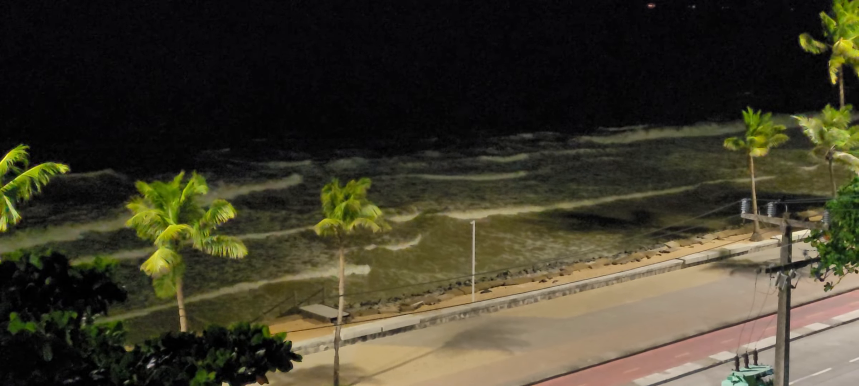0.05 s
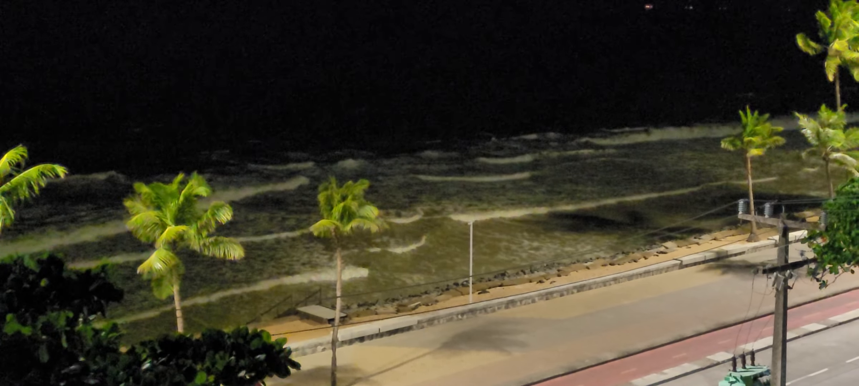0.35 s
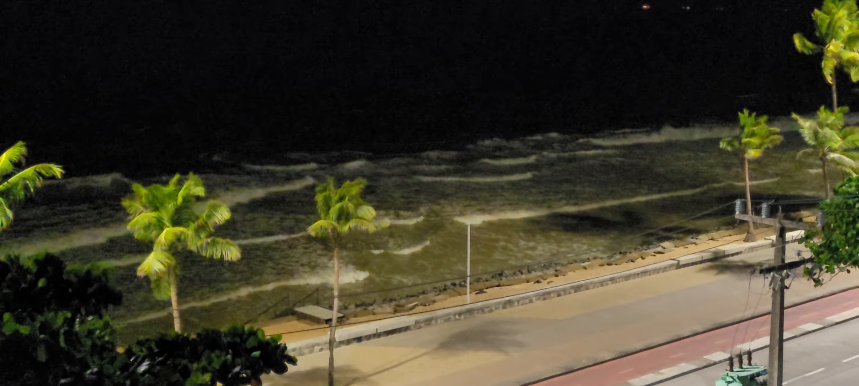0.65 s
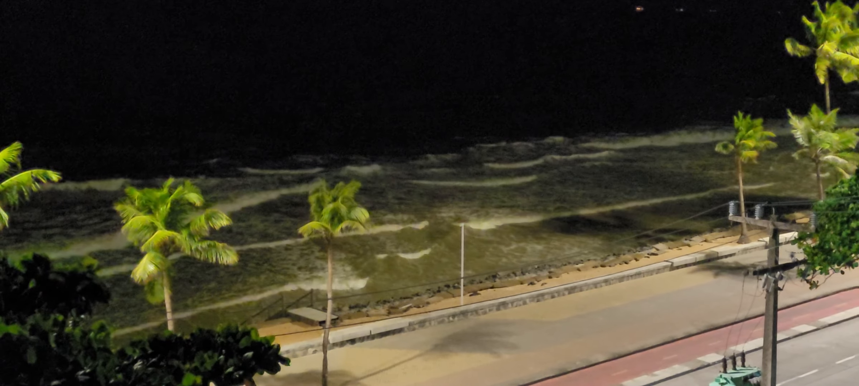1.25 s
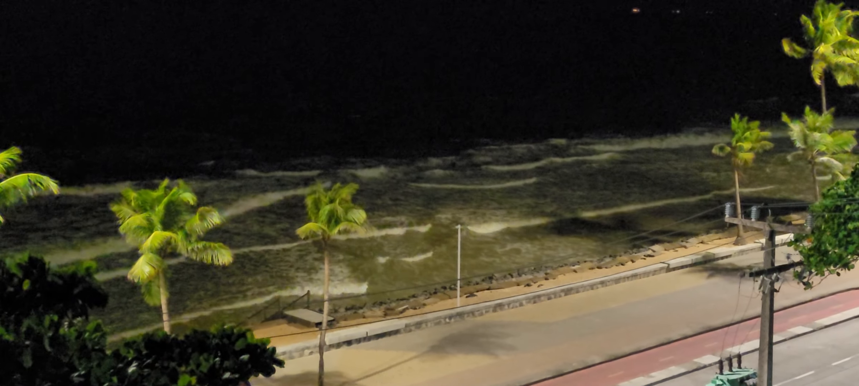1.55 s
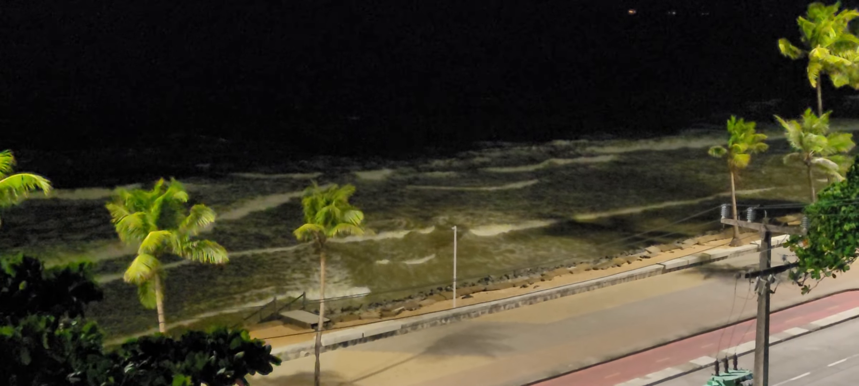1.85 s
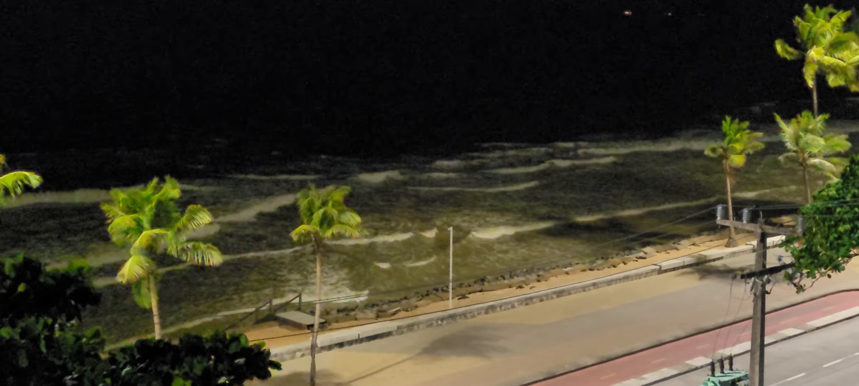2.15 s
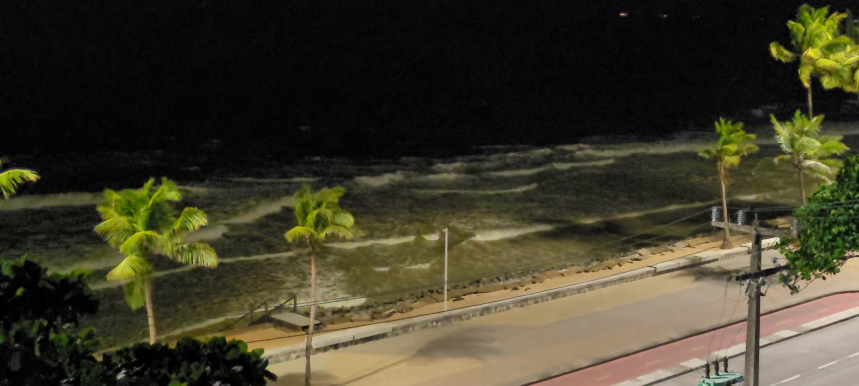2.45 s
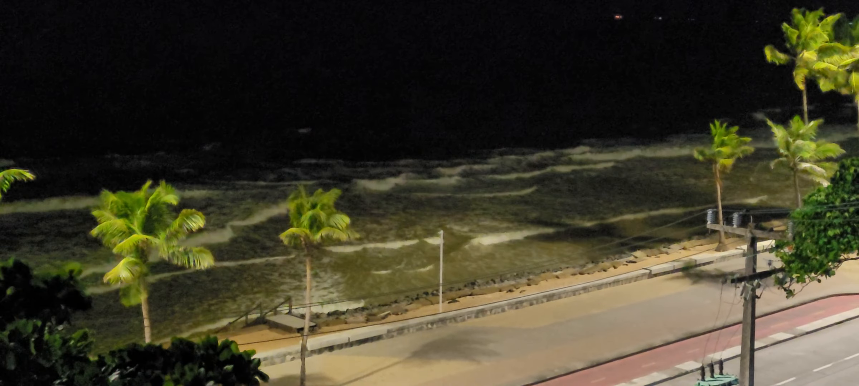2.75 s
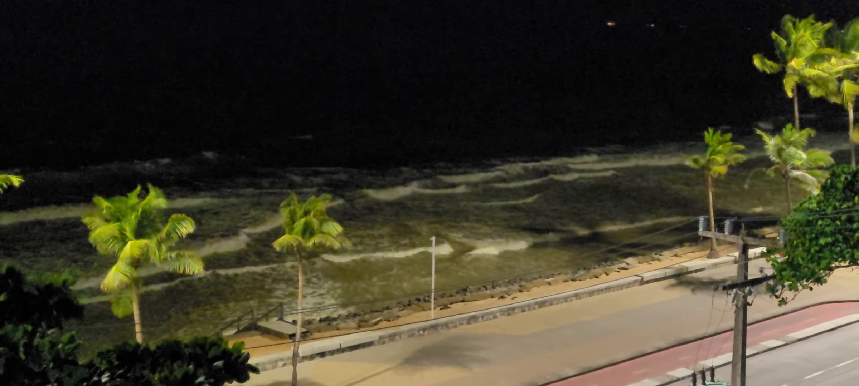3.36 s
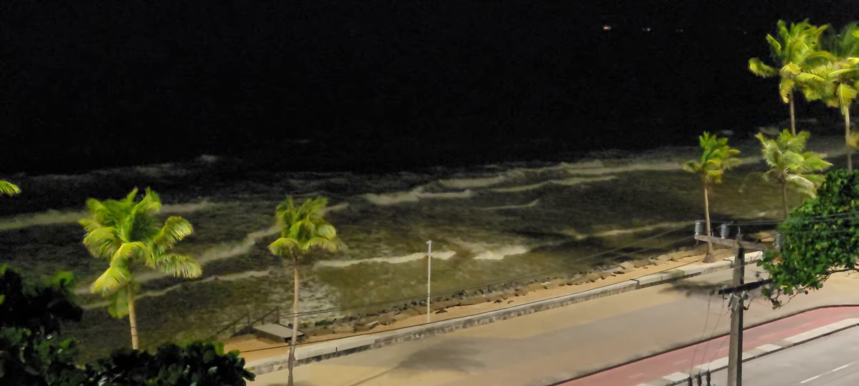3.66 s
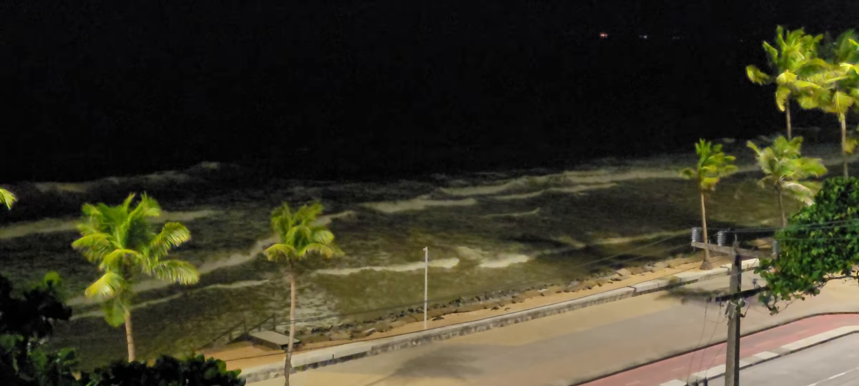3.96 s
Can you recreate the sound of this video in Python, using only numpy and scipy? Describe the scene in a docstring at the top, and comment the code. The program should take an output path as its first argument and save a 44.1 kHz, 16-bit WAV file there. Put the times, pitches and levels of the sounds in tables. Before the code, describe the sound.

Sea surf breaks in a steady roar and foamy hiss, heard from high above a beachfront. Strong gusts rumble and thump on the stereo microphone with a faint hollow hoot, growing hardest near the end before everything cuts off.

```python
"""Surf at night, heard from high above a beachfront with a stereo microphone in a strong wind.
Breakers roar, their foam hisses and their spreading fronts fizz, reaching the left side first.
Gusts rumble and thump on both microphone ports and blow a hollow hoot, with brief lulls.
In the hardest gusts the right side loses its bass and flutters instead.
The sound stops dead shortly before the end."""
import sys
import numpy as np
from scipy import signal
from scipy.fft import rfft, irfft, next_fast_len
from scipy.io import wavfile
from scipy.ndimage import uniform_filter1d, map_coordinates

SR = 44100
rng = np.random.default_rng(int(sys.argv[2]) if len(sys.argv) > 2 else 0)


def inscribe(sig):
    """Save sig as 16-bit PCM at rate SR to the path in sys.argv[1].

    A 1-D sig is mono; a 2-D sig holds one channel per row.
    Samples are clipped to [-1, 1] before scaling.
    """
    pcm = np.round(np.clip(np.atleast_2d(sig).T, -1, 1) * 32767)
    wavfile.write(sys.argv[1], SR, pcm.astype(np.int16))


N = 176400
TIME = np.arange(N) / SR


def amp(db):
    """Decibels to gain."""
    return 10 ** (np.asarray(db) / 20)


def unit(x):
    """Scaled to rms 1."""
    return x / np.sqrt(np.mean(x ** 2) + 1e-20)


def along(points, hz):
    """(Hz, value) points, read on a log axis."""
    freqs, values = np.transpose(points)
    return np.interp(np.log(hz + 1), np.log(freqs + 1), values)


def curve(rows):
    """(s, value) points, one value per sample."""
    return np.interp(TIME, *np.transpose(rows))


def wobble(rate):
    """A smooth random curve, rate knots a second."""
    return map_coordinates(rng.standard_normal(2048), [TIME * rate], mode="wrap")


def filtered(x, response):
    """x through a complex frequency response."""
    size = next_fast_len(N + SR // 2)
    return irfft(rfft(x, size) * response(np.fft.rfftfreq(size, 1 / SR)), size)[..., :N]


def even(x):
    """Noise of rms 1, its own swells levelled over 20 ms."""
    power = np.abs(uniform_filter1d(x ** 2, size=int(.02 * SR), axis=-1))
    return unit(x / np.sqrt(power + 1e-6))


def rush(colour, likeness, patchy_db, lead_ms=0):
    """Stereo noise of rms 1 with patches of random gain, the left side lead_ms ahead."""
    def mid_side(hz):
        angle = np.arccos(np.clip(along(likeness, hz), -1, 1)) / 2
        return amp(along(colour, hz)) * [np.cos(angle), np.sin(angle)]

    spectra = signal.stft(rng.standard_normal((2, N)), nperseg=512)[2]
    patches = uniform_filter1d(rng.standard_normal(spectra.shape[1:]), size=6, axis=0)
    patches = unit(uniform_filter1d(patches, size=12, axis=1))
    pair = signal.istft(spectra * amp(patchy_db * patches), nperseg=512)[1][:, :N]
    mid, side = filtered(pair, mid_side)
    stereo = np.array([mid + side, mid - side])
    lag_s = np.array([[-lead_ms], [lead_ms]]) / 2000
    return unit(filtered(stereo, lambda hz: np.exp(-2j * np.pi * hz * lag_s)))


# The sea far below the microphone. Each row: time in seconds, relative level in dB.
ROAR_LEVEL = [(0, -35.5), (.45, -36), (.8, -36.5), (1.13, -35.5), (1.4, -36), (1.65, -35.5), (2.2, -35.5),
              (2.85, -34), (2.95, -33.5), (3.08, -37.5), (3.32, -35), (3.5, -33.5)]
FOAM_LEVEL = [(0, -44.5), (.3, -43.5), (.84, -44), (1.05, -42.5), (1.2, -43), (1.3, -44), (1.8, -43),
              (2.0, -43), (2.9, -42.5), (3.15, -43.5), (3.55, -44)]
FIZZ_LEVEL = [(0, -53), (.7, -53), (1.1, -53), (1.45, -53.5), (1.75, -52), (2.4, -48.5), (2.8, -53.5),
              (3.15, -64.5), (3.55, -54.5)]
# Its tone from up here. Each row: frequency in Hz, relative density in dB.
ROAR_SPECTRUM = [(40, -16), (120, -0.5), (185, -6.5), (225, 3), (275, -2.5), (335, -1), (400, -5.5),
                 (520, -8), (620, -11), (830, -14.5), (1200, -26), (3000, -45.5)]
FOAM_SPECTRUM = [(300, -11), (780, -17.5), (960, 4.5), (1300, 2.5), (1700, 1), (2450, 0.1), (3100, -9),
                 (4600, -9), (5300, -10.5), (6000, -16), (7000, -18.5), (7800, -14.5), (8800, -23.5),
                 (10300, -20), (12500, -23), (13500, -29.5), (15700, -33.5)]
FIZZ_SPECTRUM = [(1800, -25.5), (2700, 1), (3700, 5.5), (4500, 1), (5600, -7.5), (9000, -22)]
# Its stereo width. Each row: frequency in Hz, left-right likeness from 0 to 1.
SURF_LIKENESS = [(100, 0.93), (300, .84), (430, 0.4), (750, 1), (950, 0.28), (1250, 0.63), (1650, 0.87),
                 (2300, 0.38), (3100, 0.23), (3900, 0.04), (6300, 0.47), (10000, 0.1)]
# Its balance. Each row: frequency in Hz, right over left in dB.
SURF_BALANCE = [(100, 1), (400, 1.1), (1000, 0), (4000, -.5), (8000, 0.8), (12000, 1.5), (14000, -0.5)]


def surf():
    """Breakers tumble in a low roar under the churning hiss of foam; each spreading front adds fizz."""
    roar = rush(ROAR_SPECTRUM, SURF_LIKENESS, patchy_db=1.03, lead_ms=.22)
    roar *= amp(2.5 + curve(ROAR_LEVEL) + wobble(28.1))
    foam = rush(FOAM_SPECTRUM, SURF_LIKENESS, patchy_db=1.56, lead_ms=.4516)
    foam *= amp(3.5 + curve(FOAM_LEVEL) + .82 * wobble(90))
    fizz = rush(FIZZ_SPECTRUM, SURF_LIKENESS, patchy_db=3, lead_ms=.4516)
    fizz *= amp(curve(FIZZ_LEVEL))
    return filtered(roar + foam + fizz, lambda hz: amp(along(SURF_BALANCE, hz) * [[-.5], [.5]]))


# Gusts right on the microphone. Each row: time in seconds, relative level in dB.
GUST_LEVEL = [(0, -33.5), (.2, -33.5), (.45, -38.5), (.58, -36), (.68, -41.5), (.9, -37.5), (1.2, -37),
              (1.4, -38), (1.53, -50), (1.68, -45), (1.95, -40.5), (2.22, -35.5), (2.32, -42.5),
              (2.45, -39.5), (2.85, -37.5), (3.04, -30.5), (3.3, -34.5), (3.5, -31.5)]
# Eddies hitting the ports. Each row: peak time in seconds, left and right relative levels in dB.
EDDIES = [(0.049, -31, -28.5), (.163, -28, -29.5), (0.257, -23.5, -26.5), (0.311, -32, -23),
          (1.215, -27, -30.5), (1.636, -29.5, -23.5), (1.688, -32.5, -28), (1.838, -35, -34),
          (1.909, -33, -27.5), (2.213, -30.5, -28.5), (2.395, -28.5, -28), (2.56, -28, -31),
          (2.966, -31.5, -30.5), (2.99, -20, -18.5), (3.055, -27, -41.5), (3.204, -19.5, -42),
          (3.256, -29.5, -24.5), (3.407, -24, -42), (3.495, -28, -42)]
# The tone of the buffeting. Each row: frequency in Hz, relative density in dB.
RUMBLE_SPECTRUM = [(12, -46), (25, -22), (45, -1.5), (76, 3.5), (120, -8.5), (180, -10), (300, -22),
                   (600, -27.5), (2000, -69), (8000, -120)]
THUMP_SPECTRUM = [(15, -44), (30, -24.5), (55, -3), (100, -0.5), (170, -6.5), (290, -10.5), (600, -25),
                  (2000, -60), (8000, -120)]
# Its balance. Each row: frequency in Hz, left over right in dB.
WIND_BALANCE = [(30, 2.5), (80, -0.5), (250, -0.5)]


def buffeting(thump_db=1, thump_sigma_s=.007):
    """Wind makes a lumpy rumble that differs from port to port, with a thump for each big eddy."""
    lumps = amp(2.2 * np.array([wobble(22.3), wobble(22)]))
    turbulence = even(rush(RUMBLE_SPECTRUM, likeness=[(60, .21)], patchy_db=.2))
    rumble = amp(curve(GUST_LEVEL)) * unit(lumps * turbulence)
    pulses = sum(amp([[left], [right]]) * np.exp(-.5 * ((TIME - peak) / thump_sigma_s) ** 2)
                 for peak, left, right in EDDIES)
    thumps = amp(thump_db) * pulses * even(rush(THUMP_SPECTRUM, likeness=[(60, .61)], patchy_db=1.5))
    return filtered(rumble + thumps, lambda hz: amp(along(WIND_BALANCE, hz) * [[.5], [-.5]]))


# The wind's note at the ports. Each row: time in seconds, centre pitch in Hz, level in dB.
HOOT_PATH = [(0, 300, -48.5), (.2, 328.2, -40), (.58, 290, -48.5), (.66, 321.6, -34), (.79, 339, -44),
             (.87, 314.3, -35), (.99, 323.5, -39), (1.119, 285, -36), (1.25, 255, -44), (1.35, 258, -35),
             (1.41, 264.9, -44), (1.51, 284.9, -38), (1.6, 290, -44), (1.68, 330, -41.5), (1.95, 285, -41),
             (2.101, 275, -37.5), (2.4, 325, -43), (2.549, 250, -37.5), (2.82, 300, -49.5),
             (2.94, 250, -31), (3.05, 270, -51)]


def hoot(wander_hz=10, flicker_db=2.7):
    """A hollow, unsteady note that swells and fades in the wind; its pitch drifts with the flow."""
    times, hz, db = np.transpose(HOOT_PATH)
    pitch = np.interp(TIME, times, hz) + wander_hz * wobble(70)
    phase = 2 * np.pi * np.cumsum(pitch) / SR + .45 * np.array([wobble(50), wobble(50)])
    flicker = amp(flicker_db * np.array([wobble(37), wobble(45)]))
    return amp(np.interp(TIME, times, db)) * unit(flicker * np.sin(phase))


# Brief lulls in the roar and the wind. Each row: centre time in seconds, depth in dB.
LULL_DIPS = [(0.611, 5), (.812, 7), (1.254, 21), (1.606, 8), (1.746, 10)]


def lulls(x, sigma_s=.0046, corner_hz=900):
    """The low and middle range sags for a moment in each lull."""
    sag_db = sum(db * np.exp(-.5 * ((TIME - centre) / sigma_s) ** 2) for centre, db in LULL_DIPS)
    lows = filtered(x, lambda hz: 1 / (1 + (hz / corner_hz) ** 4))
    return x + (amp(-sag_db) - 1) * lows


# Spells when the microphone's right side thins out. Each row: start and end in seconds.
THIN_SPELLS = [(1.255, 1.31), (1.384, 1.5), (2.812, 2.868), (2.998, 3.204), (3.266, 3.53)]
# The flutter in those spells. Each row: time in seconds, level in dB.
FLUTTER_LEVEL = [(2.87, -42), (3.0, -31), (3.035, -29), (3.07, -33.5), (3.13, -37.5), (3.17, -30.5),
                 (3.21, -54), (3.35, -44), (3.41, -27.5), (3.445, -35.5), (3.465, -30), (3.55, -30)]
# Its tone. Each row: frequency in Hz, relative density in dB.
FLUTTER_SPECTRUM = [(200, -25), (320, 5.5), (470, 15), (620, 3), (900, -10), (2000, -24), (5000, -43),
                    (14000, -89.5)]


def thin_flutter(x, fade_s=.0064, corner_hz=313, floor_db=-26.5):
    """During each spell the bass drops away and the wind flutters higher up."""
    gates = sum(np.tanh((TIME - start) / fade_s) - np.tanh((TIME - end) / fade_s)
                for start, end in THIN_SPELLS)
    share = np.clip(gates / 2, 0, 1)
    bassless = filtered(x, lambda hz: np.maximum(amp(floor_db), 1 - 1 / (1 + (hz / corner_hz) ** 6)))
    flicker = amp(11 * wobble(120))
    air = rush(FLUTTER_SPECTRUM, likeness=[(400, .0014)], patchy_db=2.5)[1]
    flutter = amp(curve(FLUTTER_LEVEL)) * even(flicker * air)
    return (1 - share) * x + share * (bassless + flutter)


def scene():
    """Distant sea and close wind at the two ports."""
    left, right = lulls(surf() + buffeting() + hoot())
    return np.array([left, thin_flutter(right)])


def record(dry):
    """The sound stops dead within 3 ms; nothing passes above the band limit."""
    stop_s, top_hz = 3.573, 15740
    running = np.clip((stop_s - TIME) / .003, 0, 1)
    return filtered(dry * running, lambda hz: hz < top_hz)


dry = scene()
out = record(dry)
inscribe(out)
```